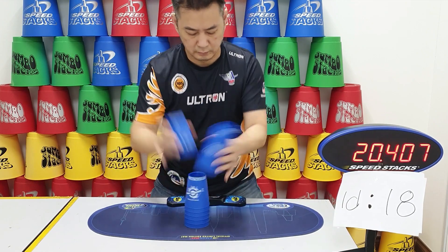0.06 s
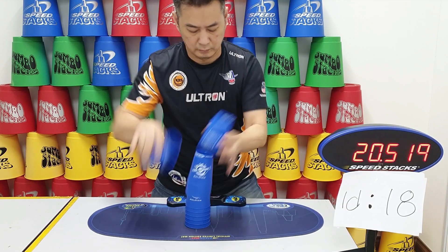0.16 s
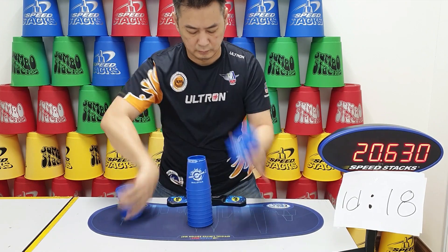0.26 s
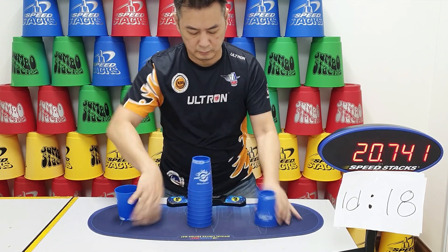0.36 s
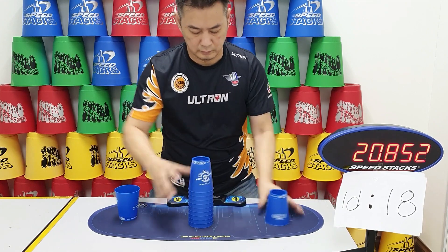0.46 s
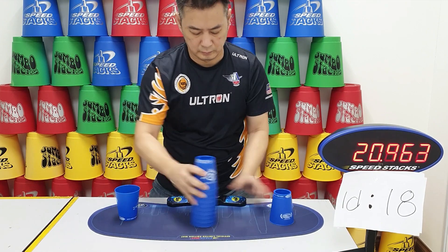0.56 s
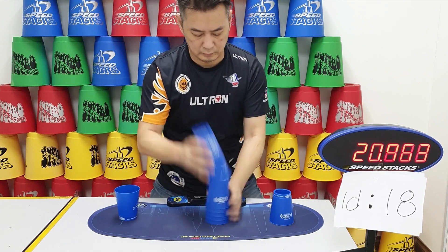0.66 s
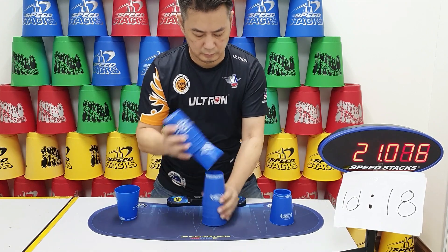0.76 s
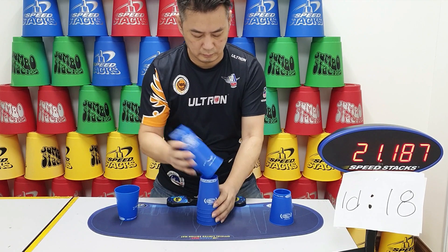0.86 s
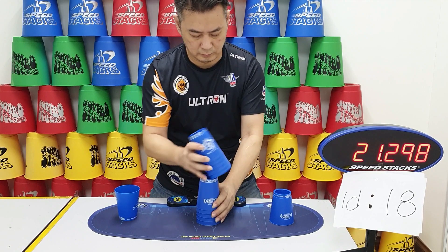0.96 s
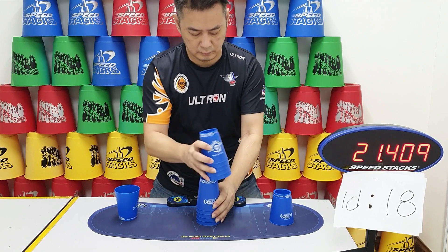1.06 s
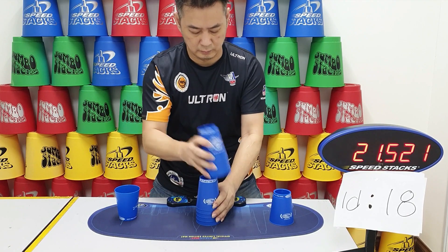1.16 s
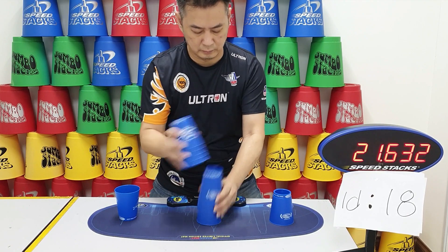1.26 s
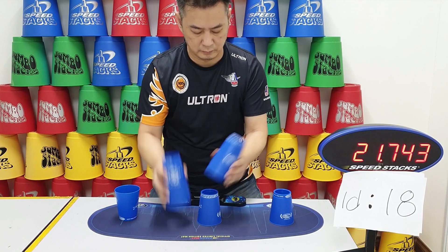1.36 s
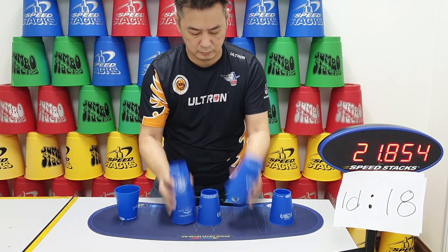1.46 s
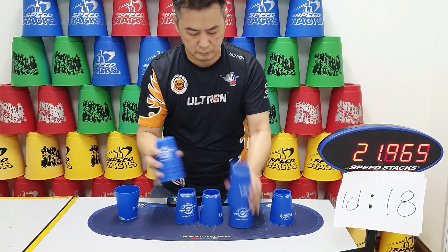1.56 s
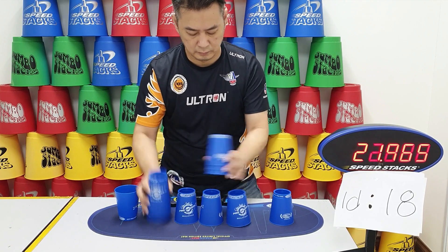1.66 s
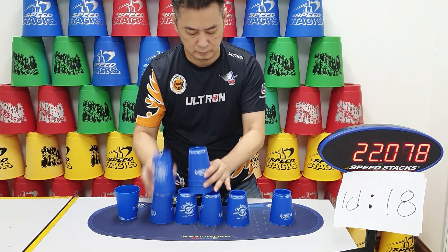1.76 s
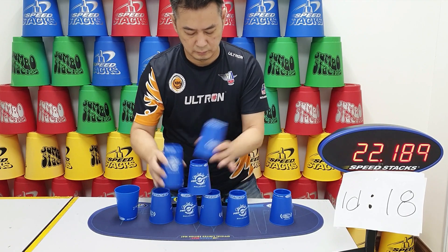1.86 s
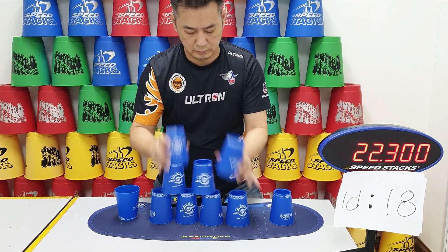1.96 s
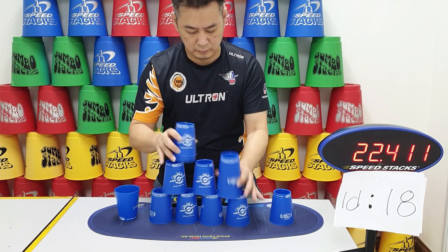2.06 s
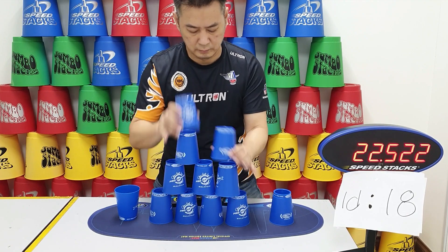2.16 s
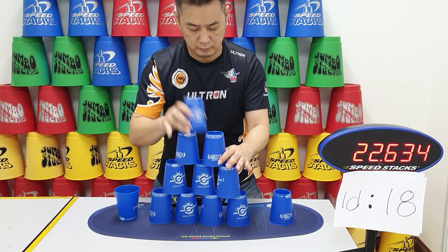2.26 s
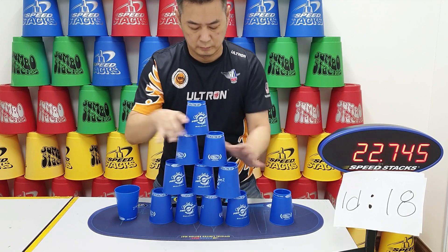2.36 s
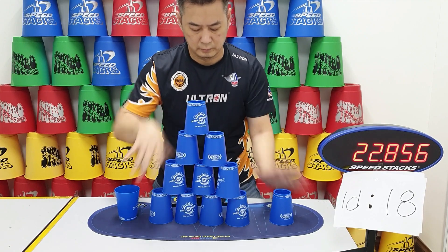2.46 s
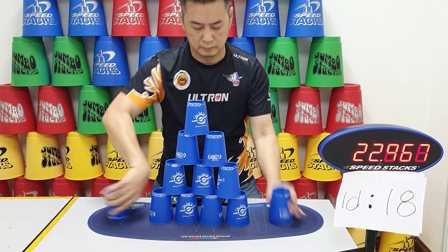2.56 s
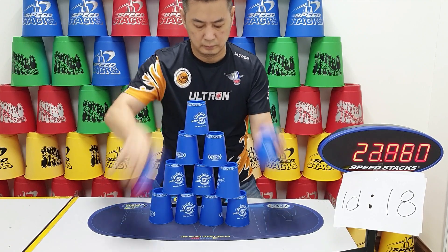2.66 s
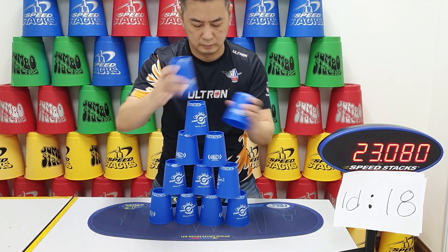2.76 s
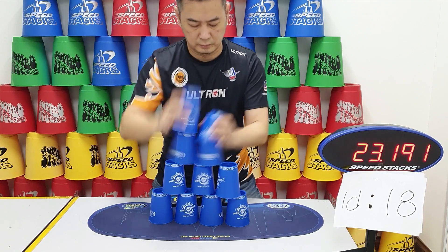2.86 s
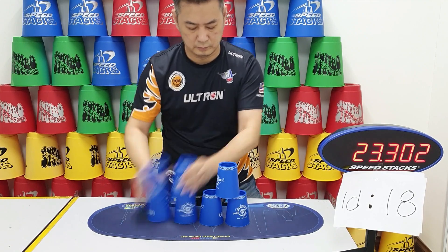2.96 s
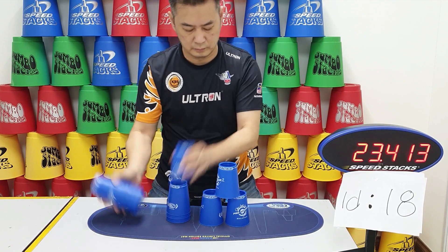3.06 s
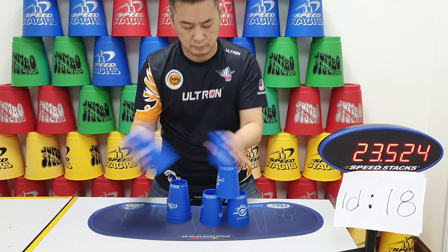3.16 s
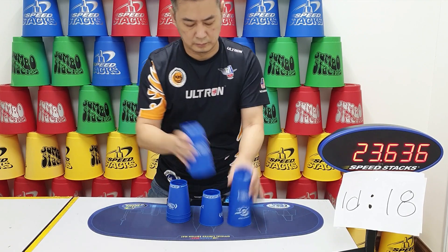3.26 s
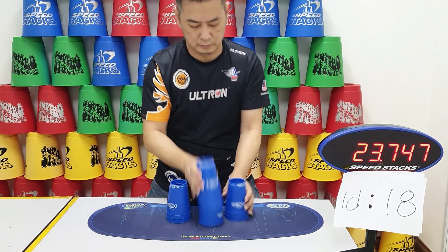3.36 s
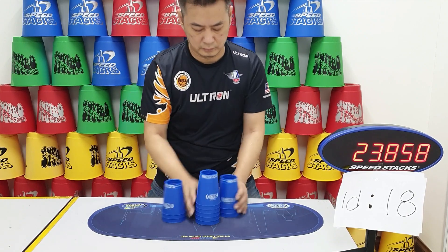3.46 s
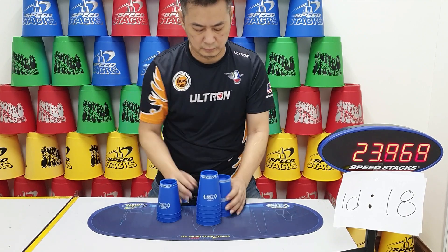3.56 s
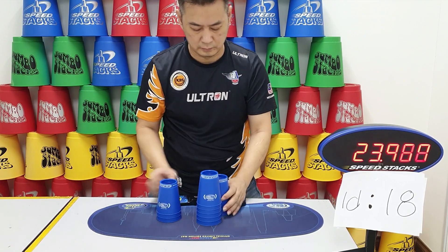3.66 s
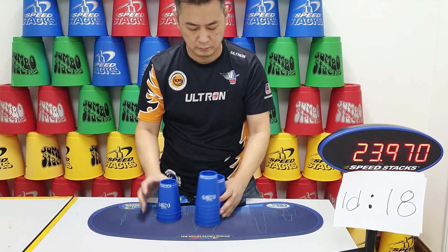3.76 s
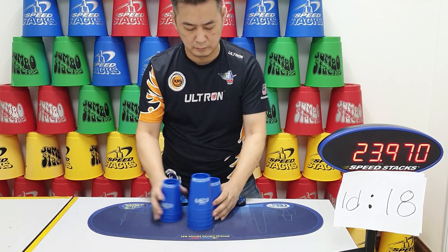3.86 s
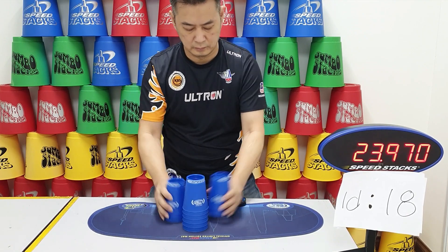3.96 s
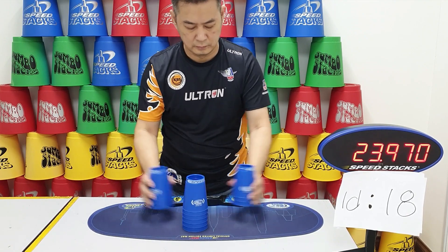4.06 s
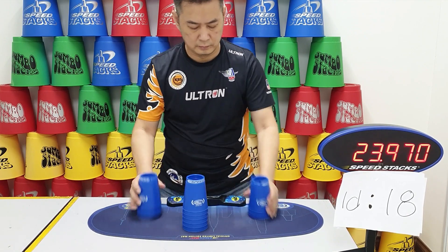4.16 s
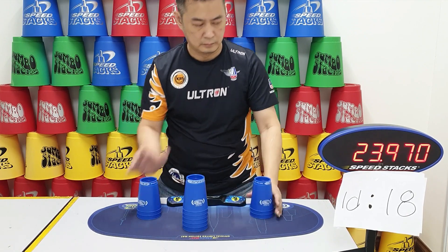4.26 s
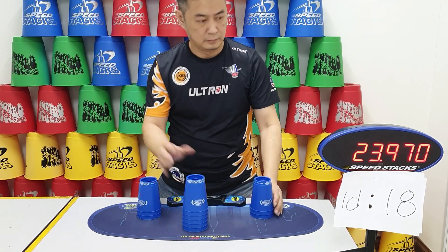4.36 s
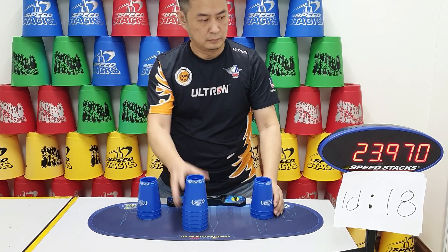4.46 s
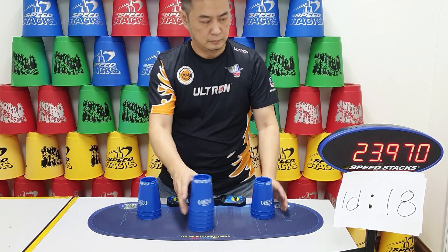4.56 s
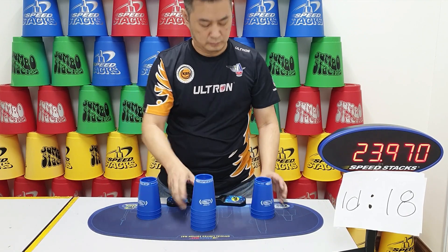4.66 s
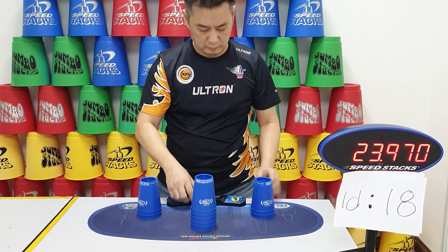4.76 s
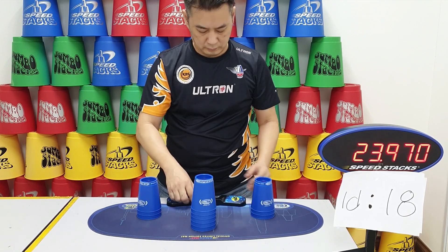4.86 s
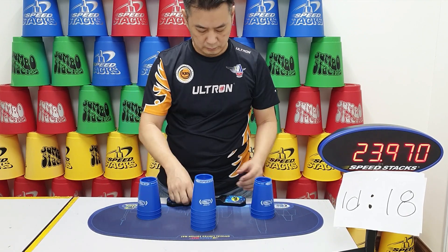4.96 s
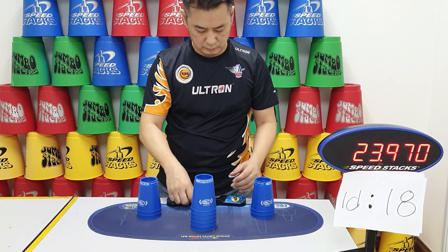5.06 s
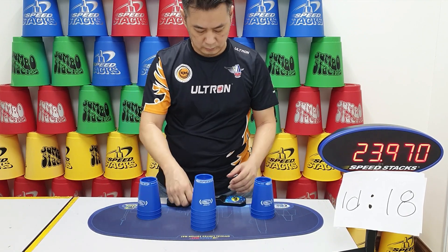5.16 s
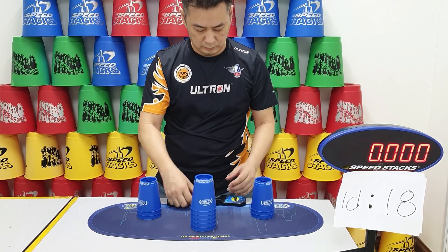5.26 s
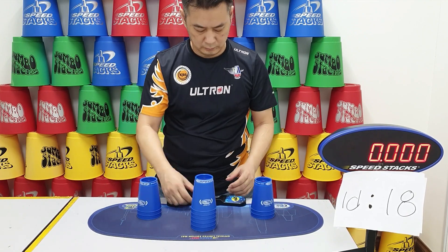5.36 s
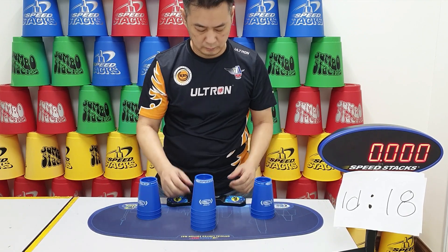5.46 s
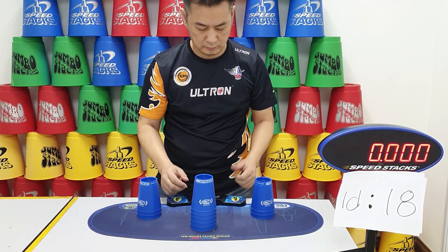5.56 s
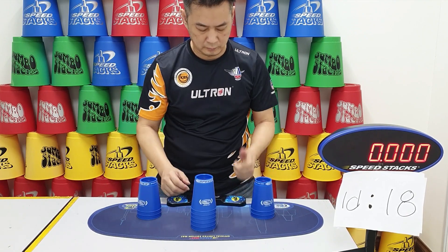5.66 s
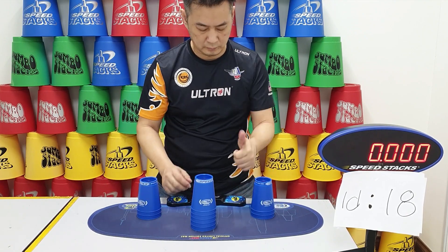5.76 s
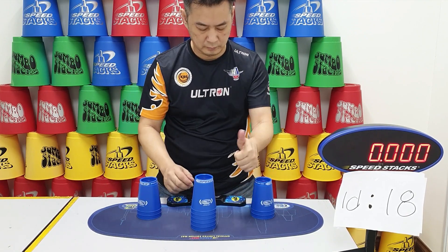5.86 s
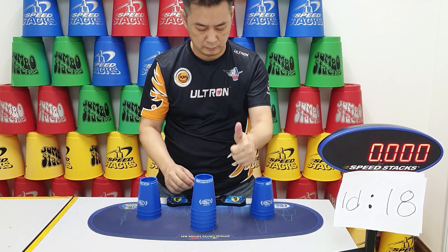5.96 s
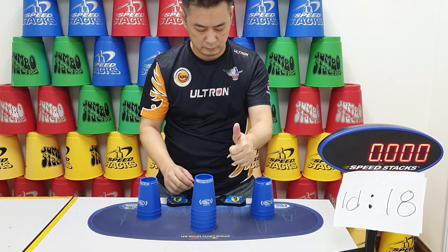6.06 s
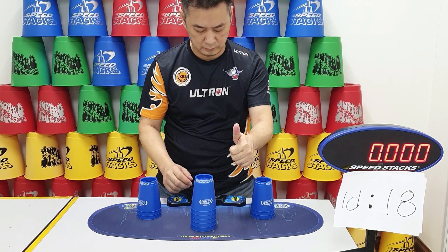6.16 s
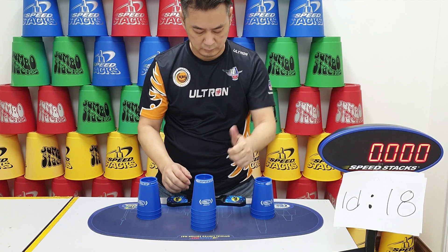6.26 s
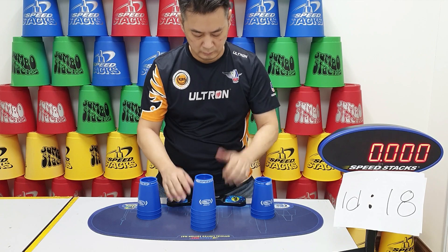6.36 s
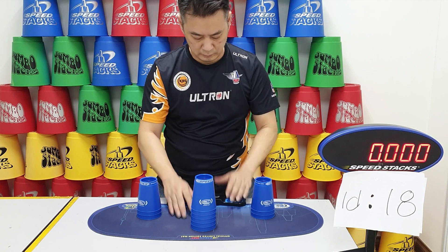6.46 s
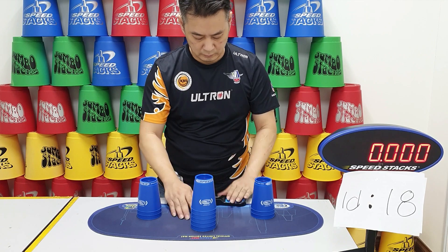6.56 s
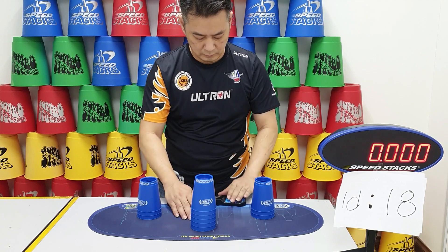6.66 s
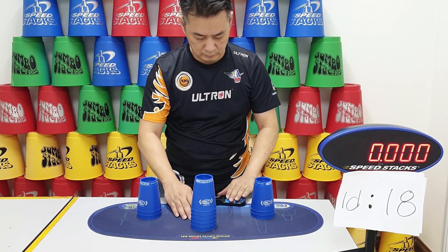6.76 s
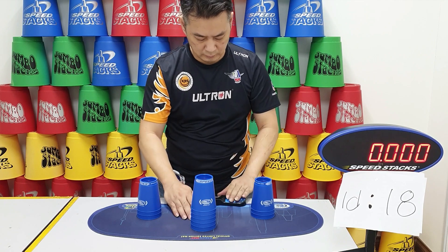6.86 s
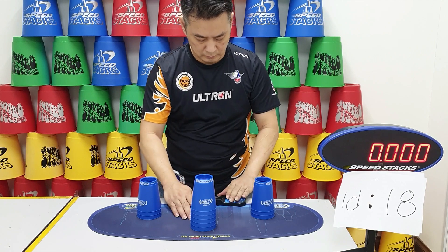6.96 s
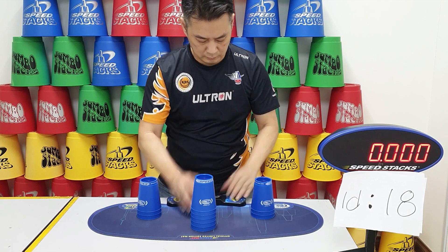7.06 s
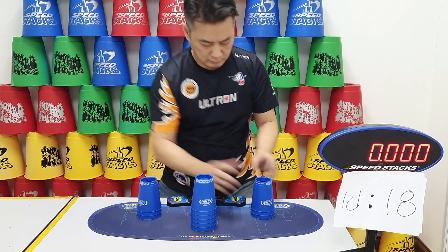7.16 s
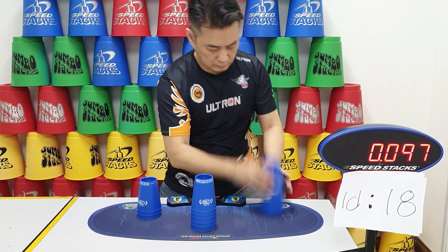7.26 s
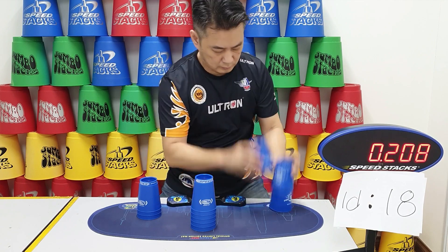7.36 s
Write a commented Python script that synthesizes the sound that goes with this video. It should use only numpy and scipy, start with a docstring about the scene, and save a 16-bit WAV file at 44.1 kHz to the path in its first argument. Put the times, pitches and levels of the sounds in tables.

```python
"""Plastic cups clatter as they are stacked into a pyramid and swept down on a padded mat in a bare, lively room.
Then fingers tap the timer, palms settle on it and brush off again, and the next round begins.
Each contact is shaped noise: the table thuds, the air in the cup knocks, its wall clacks and its rim ticks.
Fading sine tones make cups and stacks ring; every contact also sets off a noise tail that is the room.
Brushing is hissing noise, over quiet room air and a low rumble."""
import sys
import numpy as np
from scipy import signal
from scipy.fft import rfft, irfft, next_fast_len
from scipy.io import wavfile

SR = 44100
rng = np.random.default_rng(int(sys.argv[2]) if len(sys.argv) > 2 else 0)


def output_pcm(signal):
    """Save a mono or channel-first signal as 16-bit PCM at the path in sys.argv[1].

    Samples are clipped to [-1, 1] before scaling.
    """
    pcm = np.clip(np.atleast_2d(signal).T, -1, 1) * 32767
    wavfile.write(sys.argv[1], SR, np.round(pcm).astype(np.int16))


N = 326781
SPAN = 2 ** 16   # length in samples of one contact with its room tail
HZ = np.maximum(np.fft.rfftfreq(SPAN, 1 / SR), 1)   # frequencies of its spectrum
AGE = np.arange(SPAN) / SR   # seconds since the contact
TIME = np.arange(N) / SR   # seconds since the start

# resonances of table and cup walls [f/Hz, width/Hz, level/dB]
BODY_RESONANCES = [(54, 12, 13.5), (125.5, 7, 11), (140, 7.2, 5), (184, 6.1, 6), (222.5, 10, -15),
                   (313, 59, 8.5), (980, 140, 1.5), (1280, 90, 2), (1720, 900, 4.5), (2540, 680, -2),
                   (4120, 150, 1), (11800, 10000, -5)]


def from_db(db):
    """Decibels to gain."""
    return 10 ** (np.asarray(db) / 20)


def at_hz(points, hz):
    """Read a table of (frequency, value) rows along log frequency."""
    table_hz, values = np.array(points).T
    return np.interp(np.log(hz), np.log(table_hz), values)


def hump(centre_hz, q):
    """Power response of a broad resonance applied twice; a larger q makes it narrower."""
    return 1 / (1 + (q * (HZ / centre_hz - centre_hz / HZ)) ** 2) ** 2


def colour(resonances):
    """Gain of a set of peaks and dips, given as (centre Hz, width Hz, dB)."""
    return from_db(sum(db / (1 + (2 * (HZ - hz) / width) ** 2) for hz, width, db in resonances))


def causal(gain):
    """Minimum-phase response with this gain: nothing sounds before the blow."""
    cepstrum = irfft(np.log(gain + 1e-6))
    forward_only = np.r_[1, np.full(SPAN // 2 - 1, 2), np.zeros(SPAN // 2)]
    return np.exp(rfft(cepstrum * forward_only))


def add(out, s, spectrum):
    """Mix a sound, given as its spectrum, in from time s."""
    start = max(round(s * SR), 0)
    fade_out = np.minimum(10 * (AGE[-1] - AGE), 1) ** 2   # over the last 0.1 s
    sound = irfft(spectrum) * fade_out
    out[:, start:start + SPAN] += sound[:, :max(N - start, 0)]


def diffuse(size, mic_spacing_m=0.16):
    """Spectrum of white sound from all sides at two microphones: alike in the bass, unrelated in the treble."""
    hz = np.fft.rfftfreq(size, 1 / SR)
    alike = np.sinc(2 * hz * mic_spacing_m / 343)   # 343 m/s: speed of sound
    mid, side = rfft(rng.standard_normal((2, size)))
    return np.sqrt((1 + alike) / 2) * mid + np.sqrt((1 - alike) / 2) * side * [[1], [-1]]


def steady_noise(spectrum):
    """Noise from all sides with a given colour, scaled to rms 1."""
    size = next_fast_len(N, True)
    hz = np.maximum(np.fft.rfftfreq(size, 1 / SR), 1)
    noise = irfft(diffuse(size) * from_db(at_hz(spectrum, hz)), size)[:, :N]
    return noise / noise.std()


def background(air_db=-51.0, rumble_db=3.0, split_hz=110):
    """Still room air over a low rumble that swells and sinks."""
    # colour of the background noise [f/Hz, relative level per Hz/dB]
    air_colour = [(20, -7.5), (35, -13), (49, 0), (62, -5.5), (76, 4), (95, -19), (128, -12.5),
                  (180, -26.5), (330, -23.5), (700, -33), (1300, -30.5), (3300, -48.5), (14000, -54)]
    # swell of the low rumble, before rumble_db is added [t/s, level/dB]
    rumble_level = [(1.2, -57), (3.57, -50.5), (3.98, -54), (6.01, -59), (6.27, -72.5), (7.41, -56)]
    noise = steady_noise(air_colour)
    low = signal.sosfilt(signal.butter(4, split_hz, "low", fs=SR, output="sos"), noise)
    high = signal.sosfilt(signal.butter(4, split_hz, "high", fs=SR, output="sos"), noise)
    swell_db = np.interp(TIME, *np.transpose(rumble_level)) + rumble_db
    return low * from_db(swell_db) + high * from_db(air_db)


def room_path(build_s=0.0015, echo_db=0.0, blend_s=0.025):
    """Room response from one spot on the mat: a tail that builds up fast, then dies band by band.
    With echo_db above 0, uneven early echoes blend into the tail; at 0 it starts out even."""
    # how long the room rings on [f/Hz, time to fall 60 dB/s]
    room_decay = [(60, 0.27), (210, 0.57), (560, 0.56), (1470, 0.85), (3900, 0.69), (8000, 0.64),
                  (14000, 0.38)]
    field, tail = diffuse(SPAN), 0
    for (hz, t60), share in zip(room_decay, np.eye(len(room_decay))):
        # each band fades into its neighbours
        band = np.interp(np.log(HZ), np.log(np.array(room_decay)[:, 0]), share)
        equal_energy = np.sqrt(np.log(1e6) / (t60 * SR))
        tail = tail + irfft(field * band) * 1e-3 ** (AGE / t60) * equal_energy
    echoes = np.repeat(rng.standard_normal(SPAN // 64), 64).clip(-2, 2)   # one draw per 64 samples
    spread = np.log(from_db(echo_db)) * np.exp(-AGE / blend_s)
    build_up = 1 - np.exp(-(AGE / build_s) ** 2)
    return rfft(tail * np.exp(spread * echoes - spread ** 2) * build_up)


def chatter(decay_s, split_hz=1500, grain_db=1.5, evenness=0.22):
    """The contact force: one soft push below split_hz, and above it a rattle of tiny touches
    as rims skitter and cups slide into each other."""
    signs, sizes = rng.standard_normal((2, SPAN))
    grain = np.repeat(sizes[:SPAN // 32], 32).clip(-2, 2)   # one strength per 32 samples
    tiny_touches = signs * from_db(grain_db * grain) * np.exp(-AGE / decay_s)
    rattle = rfft(tiny_touches)
    # evenness is the share of the rattle's peaks and dips, in dB, that is levelled out
    rattle = rattle / causal(np.abs(rattle) ** min(evenness, 1))
    rattle = rattle / np.sqrt(np.mean(np.abs(rattle) ** 2))
    w = 1j * HZ / split_hz
    return (1 + w ** 2 * rattle) / (1 + np.sqrt(2) * w + w ** 2)


def swing(centre_hz, q):
    """The cup stores the push and gives it back over a few cycles (an all-pass: timing changes, not loudness)."""
    detune = 1j * q * (HZ / centre_hz - centre_hz / HZ)
    return (1 - detune) / (1 + detune)


def contacts(paths, rows, thud_db, tick_db, rattle_s, thud_hz=182, tick_hz=9500, knock_q=0.95,
             snap_db=2.5, snap_width_hz=550, heavy_db_per_octave=6):
    """Each blow mixes thud, knock, clack and tick, and arrives directly and through the room.
    The table's thud follows the knock, the rim's tick follows the clack; the struck wall snaps at its own pitch."""
    # short wall modes that snap straight towards the microphone [f/Hz, width/Hz, level/dB]
    snap_modes = [(1650, 500, -0.5), (2800, 1000, -0.5), (4300, 150, 4.5), (5570, 270, 1.5), (7700, 700, 0),
                  (11800, 5000, -9)]
    out, body = np.zeros((2, N)), colour(BODY_RESONANCES)
    for k, (s, knock_db, knock_hz, hard_db, clack_hz, direct_db) in enumerate(rows):
        # a heavier stack knocks lower and thuds harder
        thud = from_db(thud_db + heavy_db_per_octave * np.log2(500 / knock_hz))
        wall = hump(clack_hz, q=0.62) + from_db(tick_db) ** 2 * hump(tick_hz, q=0.41)
        power = thud ** 2 * hump(thud_hz, q=.75) + hump(knock_hz, q=knock_q) + from_db(hard_db) ** 2 * wall
        strike = from_db(knock_db) * causal(np.sqrt(power) * body)
        blow = strike * chatter(rattle_s) * swing(knock_hz, q=1.0)
        snap = causal(colour(snap_modes) * colour([(clack_hz, snap_width_hz, snap_db)]))
        add(out, s, blow * (from_db(direct_db) * snap + paths[k % len(paths)]))
    return out


def landings(paths):
    """Cups come down on the mat: the table's thud is strong beside the knock of the cup."""
    # cups and stacks land on the mat [t/s, knock level/dB, knock f/Hz,
    # hardness = wall clack relative to knock/dB, clack f/Hz, direct sound relative to room/dB]
    mat_hits = [(0.001, 33, 693, -8.5, 1700, -10), (0.055, 29, 490, -6.5, 2050, -8.5),
                (0.36, 20.5, 470, -28, 2000, -9), (0.91, 20, 300, -11, 2960, -9.5),
                (1.52, 20, 414, -27.5, 3004, -16), (1.771, 32, 570, -18, 2000, -10.5),
                (2.637, 14.5, 551, -28, 2800, -9.5), (3.078, 31, 440, -11, 2600, -9.5),
                (3.489, 28, 600, -9.5, 1950, -7.5), (4.266, 23.5, 504, -12.5, 3600, -8.5),
                (7.313, 15, 410, -17, 2000, -12)]
    return contacts(paths, mat_hits, thud_db=0.5, tick_db=-11, rattle_s=0.0026)


def slides(paths):
    """Cups run down into each other in a longer rattle."""
    # cups slide into each other [t/s, knock level/dB, knock f/Hz,
    # hardness = wall clack relative to knock/dB, clack f/Hz, direct sound relative to room/dB]
    cup_slides = [(0.027, 32.5, 370, -17.5, 1600, -8), (2.963, 33.5, 674, -10, 2084, -8.5),
                  (2.989, 30, 910, -10, 3200, -13.5), (3.041, 28.5, 720, -7, 2800, -8),
                  (3.105, 25.5, 754, -15.5, 2400, -17.5), (3.256, 24, 740, -13, 2400, -11),
                  (3.412, 32.5, 520, -15, 1700, -7.5), (4.277, 25, 455.6, -8.5, 2090, -7.5)]
    return contacts(paths, cup_slides, thud_db=-14.5, tick_db=-9, rattle_s=0.013)


def ringing_cups(paths, direct_db=-8.5, ring_t60_s=0.055):
    """Free cups swing on at one pitch, closed stacks in several modes; both feed the room."""
    # a cup let go after a blow hums on at one pitch [t/s, f/Hz, level/dB]
    free_rings = [(.055, 308, 33), (0.054, 1295, 35), (.458, 914, 35.5), (.458, 1016, 35.5),
                  (.981, 964, 27), (1.629, 818, 28.5), (1.846, 755, 37.5), (2.171, 1292, 31),
                  (2.374, 1245, 37.5), (2.374, 1445, 34), (2.92, 1400, 37.5), (3.412, 525, 40)]
    # modes of a nested stack at pitch factor 1 [f/Hz, relative level/dB, time to fall 60 dB/s]
    nested_modes = [(802, -0.5, 0.024), (1750, 3.5, 0.084), (1860, -5, 0.022), (3280, -6, 0.014),
                    (3420, -8.5, 0.05), (4000, -9, 0.04)]
    # a stack snaps shut and rings [t/s, pitch factor, level/dB]
    stack_snaps = [(0.981, 1.06, 23), (1.845, 1.1, 19.5), (3.41, 1.2, 12.5), (4.266, 1.0, 32)]
    out = np.zeros((2, N))
    tones = [(s, hz, db, ring_t60_s) for s, hz, db in free_rings]
    for s, pitch, db in stack_snaps:
        tones += [(s, pitch * hz, db + mode_db, t60) for hz, mode_db, t60 in nested_modes]
    for k, (s, hz, db, t60) in enumerate(tones):
        damping = np.log(1000) / t60
        # 2 * damping / SR: about the same spectral peak however long the tone rings
        envelope = from_db(db) * 2 * damping / SR * np.exp(-damping * AGE)
        ring = envelope * np.sin(2 * np.pi * hz * AGE)
        add(out, s, rfft(ring) * (from_db(direct_db) + paths[k % len(paths)]))
    return out


def touches(paths, knock_hz=560, clack_hz=2700, direct_db=-12):
    """Light finger contacts, all at about one pitch."""
    # fingers touch cups and timer [t/s, knock level/dB, hardness = wall clack relative to knock/dB]
    finger_taps = [(0.302, 11.5, -14), (0.725, 3, -13), (0.778, -1.5, -8.5), (0.886, 6, -9),
                   (1.565, -2, -3.5), (2.612, 6.5, -13), (2.916, 19.5, -13), (4.877, -6, -7.5),
                   (5.176, -13.5, 4.5), (5.295, -9.5, -5), (6.596, -12.5, 0.5)]
    rows = [(s, knock_db, knock_hz, hard_db, clack_hz, direct_db) for s, knock_db, hard_db in finger_taps]
    return contacts(paths, rows, thud_db=-2, tick_db=-8, rattle_s=0.005)


def clacks(paths):
    """Cup on cup: a short rattle, with little thud."""
    # one cup strikes another [t/s, knock level/dB, knock f/Hz,
    # hardness = wall clack relative to knock/dB, clack f/Hz, direct sound relative to room/dB]
    cup_hits = [(0.458, 31, 580, -41, 2500, -9.5), (0.981, 16.5, 1400, -8.5, 7500, -7.5),
                (1.629, 24.5, 468, -15, 4000, -11.5), (1.846, 26, 726.5, -13, 1900, -7.5),
                (1.995, 30, 560, -24.5, 4854, -8), (2.136, 31.5, 550, -21, 3700, -8),
                (2.171, 24, 750, -16, 1709, -8.5), (2.326, 31.5, 590, -24, 4550, -7.5),
                (2.374, 29, 610, -20.5, 4700, -5), (2.9205, 34.5, 656, -15.5, 3233, -6.5),
                (2.969, 28, 620, -5.5, 4350, -3.5), (3.329, 24.5, 700, -11, 3600, -9),
                (7.376, 6.5, 690, -2.5, 8350, -7)]
    return contacts(paths, cup_hits, thud_db=-10.5, tick_db=-14, rattle_s=0.0018)


def hisses(attack_s=0.033, t60_s=0.75):
    """Soft hiss, mostly the friction of hands and sleeves: each one swells, holds and dies away in the room."""
    # colour of the hiss [f/Hz, relative level per Hz/dB]
    hiss_colour = [(200, -34.5), (600, 2), (1500, -4.5), (3000, -2), (8000, -9), (13000, -7.5),
                   (16000, -19.5)]
    # hands and sleeves brush past; the last, loud hiss belongs to a cup clack
    # [t/s, time until the hiss starts to die away/s, level/dB]
    hiss_events = [(0.642, 0.28, -59.5), (3.758, 0.32, -60), (4.15, 0.092, -56), (4.565, 0.032, -55.5),
                   (5.176, 0.5, -64.5), (6.287, 0.3, -69.5), (7.103, 0.12, -54.5), (7.35, 0.04, -40.5)]
    level = 0
    for s, length, db in hiss_events:
        rise = np.clip((TIME - s) / attack_s, 0, 1)
        fall = np.exp(-np.log(1000) * np.maximum(TIME - s - length, 0) / t60_s)
        level = level + from_db(db) * rise * fall
    return steady_noise(hiss_colour) * level


def soft_thumps(paths, thump_hz=115, soft_hz=205, direct_db=-2.5):
    """A gentle contact, such as a flat hand, moves only the lowest modes of the table."""
    # soft thumps on the table: a cup stack set down gently, then flat hands [t/s, level/dB]
    thump_events = [(1.394, 0), (4.583, 11), (4.626, 9), (6.573, 12.5), (6.597, 12), (6.637, 1)]
    out = np.zeros((2, N))
    soft_power = hump(thump_hz, q=0.92) / (1 + (HZ / soft_hz) ** 12)
    thump = causal(np.sqrt(soft_power) * colour(BODY_RESONANCES))
    for path, (s, db) in zip(paths, thump_events):
        add(out, s, from_db(db) * thump * (from_db(direct_db) + path))
    return out


def scene(count=9):
    """Cups and hands at several spots on the mat, in the room."""
    paths = [room_path() for spot in range(count)]
    sources = (landings, slides, ringing_cups, touches, clacks, soft_thumps)
    table = sum(source(paths) for source in sources)
    balance = from_db([[-.2], [.2]])   # left, right
    return table * balance + hisses() + background()


def record(dry, cutoff_hz=14700):
    """The deepest bass is dropped, the highest peaks are rounded and the top is cut."""
    lean = signal.sosfilt(signal.butter(3, 38, "high", fs=SR, output="sos"), dry)
    rounded = lean / (1 + (lean / .95) ** 4) ** (1 / 4)   # never beyond 0.95
    return signal.sosfilt(signal.ellip(8, .3, 70, cutoff_hz, fs=SR, output="sos"), rounded)


dry = scene()
out = record(dry)
output_pcm(out)
```